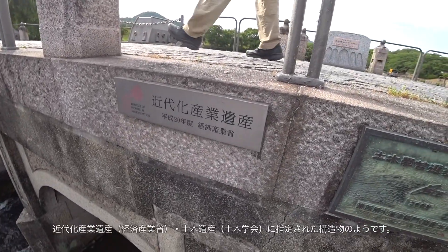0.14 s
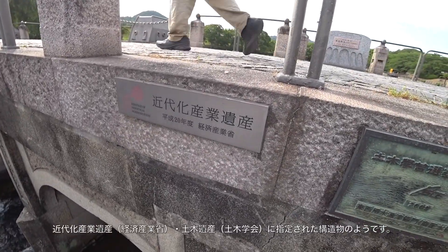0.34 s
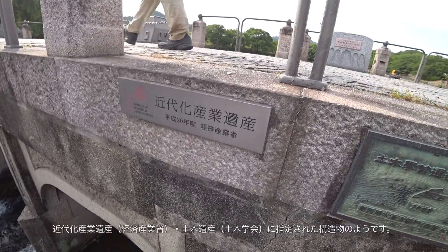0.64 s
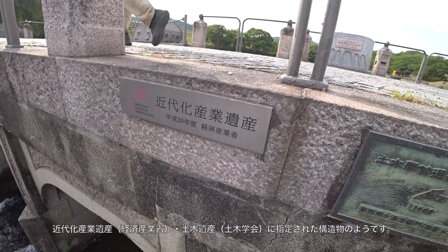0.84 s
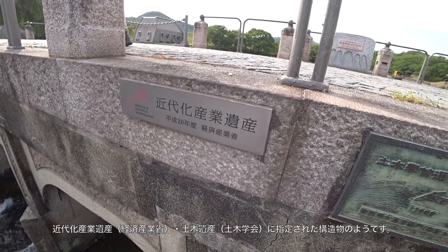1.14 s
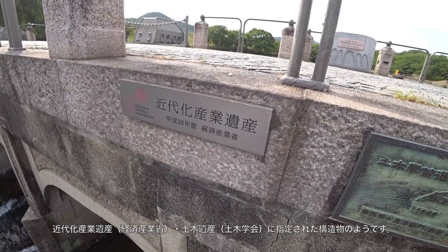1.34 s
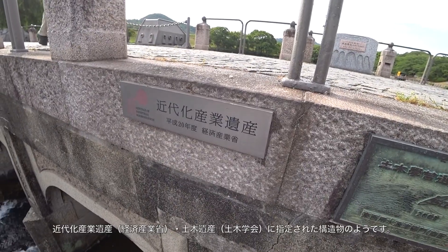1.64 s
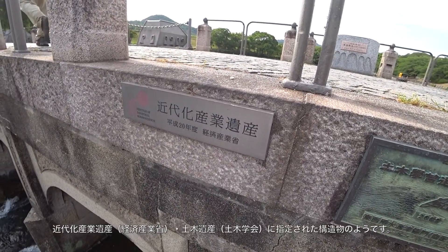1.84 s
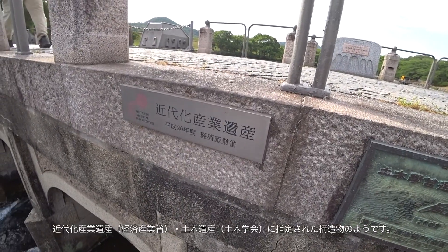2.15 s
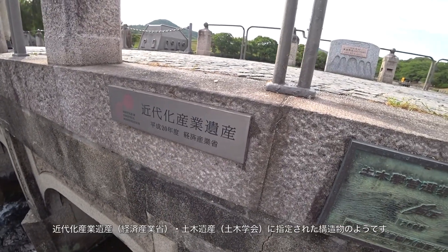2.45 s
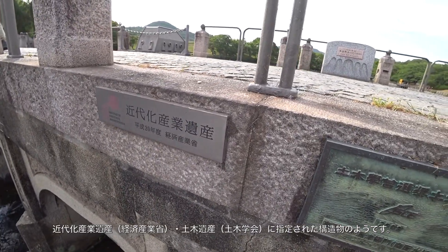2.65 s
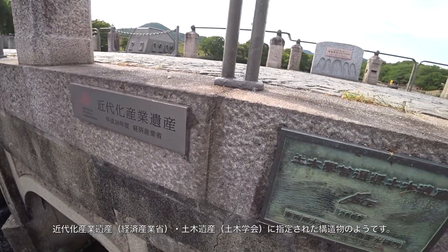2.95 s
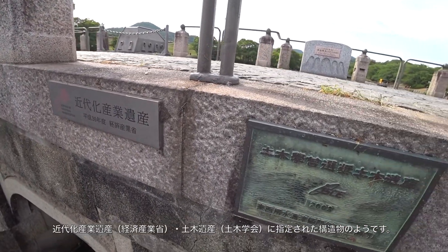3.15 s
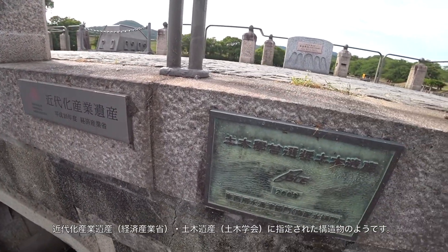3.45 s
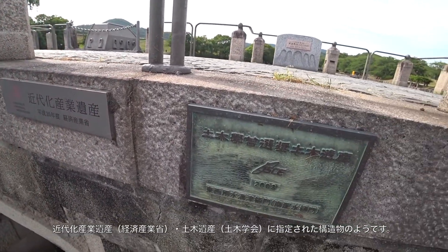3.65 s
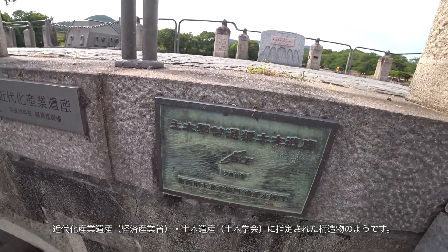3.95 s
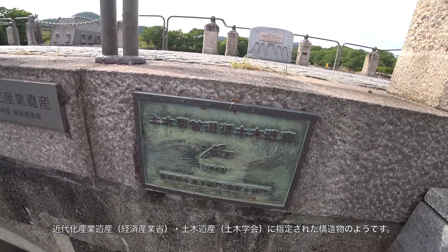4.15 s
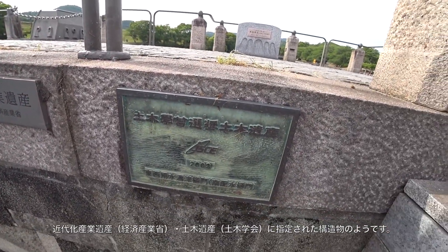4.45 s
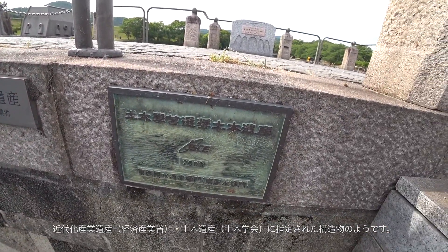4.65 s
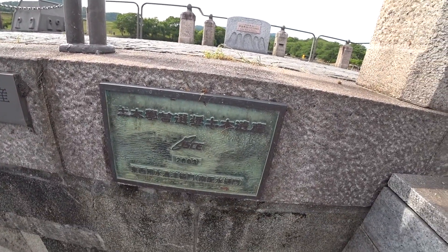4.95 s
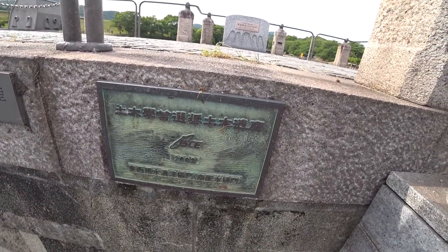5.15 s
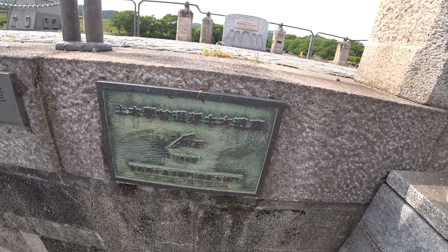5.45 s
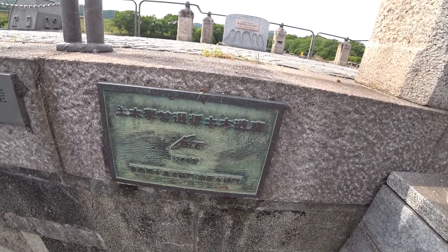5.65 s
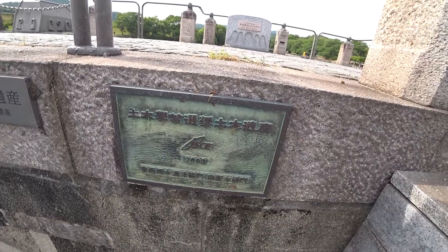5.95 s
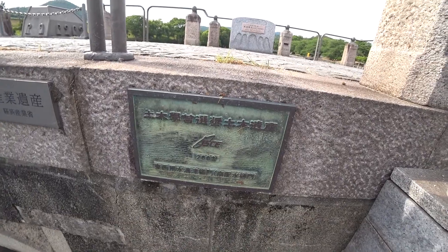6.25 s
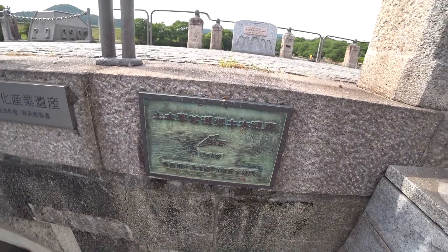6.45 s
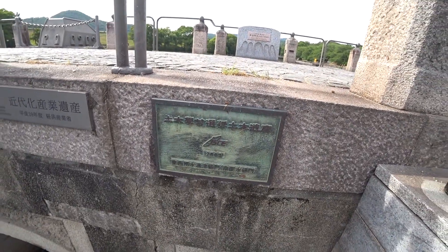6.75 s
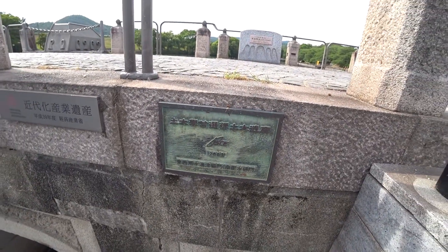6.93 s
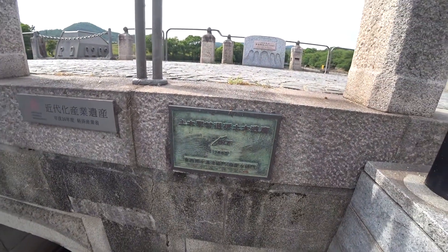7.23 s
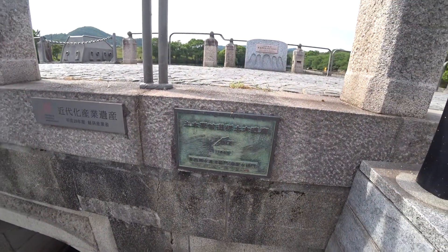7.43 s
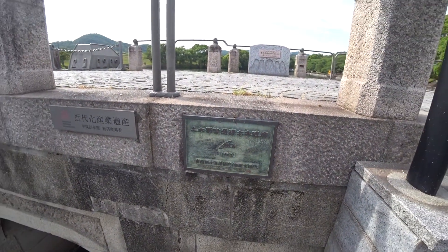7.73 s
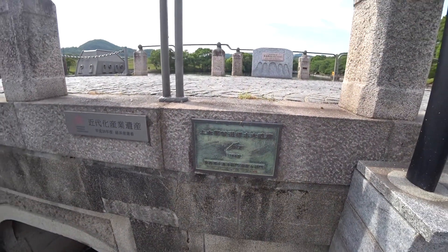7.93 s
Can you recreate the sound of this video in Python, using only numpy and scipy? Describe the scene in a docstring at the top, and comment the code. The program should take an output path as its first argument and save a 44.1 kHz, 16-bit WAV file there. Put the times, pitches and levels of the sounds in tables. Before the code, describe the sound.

A steady rush of falling water in a stone channel, with hissing spray, small bubbling pops and faint hollow glugs.

```python
"""Stone channel below a sluice gate: falling water roars, surges and throws spray.
Crowds of bubbles fizz and gurgle; the largest ping out of the roar and echo off the wall.
The arch booms and hollows glug. Low thuds join at 3.6 s, puffs of breeze at 5.5 s.
The mid-treble is nearly mono at first, widens mid-scene, then narrows again."""
import sys
import numpy as np
from scipy import signal
from scipy.fft import rfft, irfft, next_fast_len
from scipy.io import wavfile
from scipy.ndimage import uniform_filter1d, map_coordinates

SR = 44100
rng = np.random.default_rng(int(sys.argv[2]) if len(sys.argv) > 2 else 0)


def dump_mix(stems):
    """Bounce the given channels to the path in sys.argv[1] as a 16-bit WAV at rate SR."""
    frames = np.atleast_2d(stems).T  # one column per channel
    limited = np.clip(frames, -1, 1)  # hard clip at full scale
    pcm = np.round(limited * 32767).astype(np.int16)
    wavfile.write(sys.argv[1], SR, pcm)


N = 356769

# Falling water (frequency [Hz], density [dB])
WATER_SPECTRUM = [(15, -75), (25, -52), (156, -31), (216, -23), (435, -4.5), (570, -3.5), (670, -1.5),
                  (1150, -1.5), (1500, -2.5), (1720, -2), (1870, -3.5), (2950, -6), (5950, -9.5),
                  (10800, -18), (15700, -31)]
# Channel resonances (time [s], arch boom [dB], hollow glug [dB])
HOLLOW_LEVELS = [(0, -52.5, -75), (1, -49, -55), (2.2, -48, -58), (2.9, -57, -71), (3.6, -61, -54),
                 (4.6, -70, -49), (5.3, -59, -48), (5.8, -71, -47), (6.3, -52, -50), (7, -62, -51),
                 (8.09, -59, -70)]
# Lowest rumble (time [s], level [dB])
RUMBLE_LEVELS = [(0, -64), (.6, -71), (2.8, -72), (3.8, -67.5), (5, -67.5), (6.5, -67), (8.09, -69)]
# Slow swell of the fall (time [s], roar [dB], spray over roar [dB])
FLOW_LEVELS = [(0, -28.5, -5), (.3, -29, -2.5), (.75, -30, -1.5), (1.1, -28, -2), (1.6, -28, -3.5),
               (2.1, -29.5, -1), (2.5, -31, -2), (2.85, -30, -3), (3.4, -29, -4.5), (3.9, -29.5, -3.5),
               (4.4, -30, -4), (4.9, -30.5, -3.5), (5.3, -29, -3), (5.6, -31, -2.5), (6.3, -28.5, -4),
               (6.8, -29.5, -5), (7.4, -30, -2.5), (8.09, -28.5, -5.5)]
# Sheets of water gather and slap down (time [s], spray lift [dB], roar lift [dB])
SHEET_SLAPS = [(.03, 3, 2), (.11, 3.5, 1), (.18, 2.5, 1.5), (.31, -1, 0.5), (.55, 3, 3), (.62, 1, 2),
               (.93, 0.5, -0.5), (1.0, 1.5, 0.5), (1.37, 1.5, 1), (1.43, 2, 0.5), (1.47, 3, -0.5),
               (1.71, 1, 2), (1.76, 3, -1), (2.14, 0, 3), (2.31, 1, -2), (2.345, 3.5, 5), (2.63, 4, 0.5),
               (2.74, 2, -2), (3.01, 2, 0), (3.13, 1.5, 0), (3.325, 0.5, 3), (3.54, 1.5, 1), (3.72, 2, 0.5),
               (4.49, 1, 1.5), (5.2, -0.5, 0.5), (5.29, 1, 0), (5.4, -0.5, 1), (5.47, 3.5, 2),
               (6.19, 1.5, -0.5), (6.7, 2.5, 0.5), (6.92, 1.5, 0), (7.6, 0, 0), (7.82, 2.5, 0.5),
               (7.97, 1.5, 1.5)]
# Brief level dips (time [s], depth [dB])
DIPS = [(.075, 1.5), (.72, 1.5), (.59, 1), (2.27, -2), (2.42, -1), (2.88, 0.5), (4.35, 1.5), (4.93, 3.5),
        (5.53, 0.5), (6.74, 2.5)]
# Largest bubbles, and a few brief slaps of water that ring out like them (time [s], pitch [Hz], peak [dB], half
# length [ms])
DISTINCT_RINGS = [(0.3178, 7300, -27, 1.5), (0.7962, 12403, -27, 1.0), (.522, 7670, -28, 1.5),
                  (.551, 7840, -28, 1.5), (.554, 6720, -27, 1.5), (.555, 740, -34, 12), (.566, 1780, -24, 5),
                  (.605, 7670, -28, 1.5), (.614, 4200, -27, 1), (.616, 2040, -21, 4), (.722, 9100, -25, .8),
                  (.9285, 4330, -19, 1.4), (0.929, 6100, -24, 1.5), (1.014, 1640, -22, 5),
                  (1.036, 11000, -29, 1), (1.131, 4730, -25, 2), (1.2505, 1060, -20, 2.2),
                  (1.291, 9560, -29, 1.5), (1.411, 5000, -25, 1.8), (1.426, 10100, -26, 1.2),
                  (1.43, 6500, -20, 1), (1.448, 10500, -26, 1.2), (1.5265, 8039, -24, 1.2),
                  (1.733, 3750, -24, 2.5), (1.737, 1640, -26, 5), (2.022, 7490, -27, 1.5),
                  (2.061, 696, -26, 12), (2.1048, 3150, -20, 1.7), (2.1637, 1730, -21, 4.7),
                  (2.1638, 3030, -12, 1.8), (2.2999, 14240, -24, 0.3), (2.3307, 2000, -14, .7),
                  (2.335, 7670, -28, 1.5), (2.336, 1000, -25, 6), (2.341, 4900, -25, 1.5),
                  (2.35, 8180, -28, 1.5), (2.439, 2400, -21, 3.4), (2.7162, 6431, -24, 1.9),
                  (2.7347, 3260, -21, 1.7), (3.1341, 6170, -18, 2), (3.1676, 2123, -25, 6.3),
                  (3.3181, 6400, -21, 1.6), (3.319, 4130, -26, 1.8), (3.3295, 9900, -20, 0.7),
                  (3.33, 5170, -25, 1), (3.5336, 4570, -21, 1.6), (3.713, 516, -30, 8.8),
                  (3.722, 6550, -26, 1.5), (3.758, 6370, -22, 1.5), (3.9053, 2756, -21, 1.3),
                  (4.239, 686, -26, 10), (4.312, 5940, -23, 1.8), (4.426, 7920, -30, 1.5),
                  (4.476, 3550, -27, 2.5), (4.506, 540, -30, 13), (4.3717, 10335, -30, 1.2),
                  (4.621, 10800, -24, 1.1), (4.664, 12800, -37, 1), (4.873, 10700, -34, 1),
                  (4.886, 8700, -32, 1.2), (5.082, 11200, -33, 1), (5.206, 11000, -31, 1),
                  (5.265, 11600, -32, 1), (5.449, 10300, -30, 1), (5.7, 9400, -32, 1.2),
                  (5.785, 10900, -33, 1), (6.103, 12700, -31, 1), (6.418, 8100, -31, 1.3),
                  (6.621, 7060, -25, 1.4), (4.8033, 11254, -29, 1.4), (4.895, 2910, -27, 5),
                  (4.988, 4900, -30, 3), (4.989, 2990, -26, 9.8), (5.042, 600, -37, 12),
                  (5.144, 2850, -25, 3), (5.157, 2950, -27, 3), (5.181, 2450, -28, 3),
                  (5.204, 2830, -24, 2.4), (5.2525, 2900, -24, 2.4), (5.284, 2450, -23, 3),
                  (5.345, 1950, -24, 2.7), (5.449, 2420, -25, 7), (5.2527, 573, -28, 18),
                  (5.3164, 4560, -23, 2.6), (5.718, 2460, -23, 3.9), (5.396, 595, -24, 3.6),
                  (5.46, 1180, -20, 6.3), (5.684, 800, -27, 10), (5.743, 2960, -27, 6),
                  (5.7741, 1247, -22, 4.8), (5.825, 2800, -26, 6), (5.889, 5770, -29, 1.6),
                  (6.1038, 613, -29, 19), (6.1649, 6700, -21, 1.6), (6.1959, 3580, -14, 2.1),
                  (6.259, 9390, -30, 1.4), (6.321, 600, -28, 7.8), (6.591, 3010, -20, 2),
                  (6.92, 2752, -26, 3.9), (6.922, 6030, -28, 1.5), (6.938, 4480, -27, 2.5),
                  (7.04, 570, -27, 7.8), (7.332, 750, -27, 9.3), (7.5384, 1850, -26, 6.8),
                  (7.6044, 7360, -27, 2.7), (7.8302, 4400, -25, 2.4), (7.9203, 1790, -24, 9.6),
                  (7.933, 1050, -25, 8)]
# Low knocks (time [s], relative level [dB], pitch [Hz])
KNOCKS = [(3.571, -52, 152), (4.064, -50, 160), (4.519, -52, 155), (4.796, -56, 166), (5.279, -46, 172),
          (5.369, -51, 151), (6.078, -51, 97), (6.311, -49, 171), (6.6, -47, 162), (6.917, -53, 171)]
# Puffs of breeze (time [s], level [dB], half length [s])
PUFFS = [(5.55, -61, 0.13), (5.88, -64, .1), (6.07, -54, 0.074), (6.93, -60, 0.091), (7.2, -65, 0.15),
         (7.575, -60, .07), (8.0, -66, 0.14)]
# Breeze on the microphone ports (frequency [Hz], density [dB])
PUFF_SPECTRUM = [(20, -16), (60, -11), (110, -2), (200, 6), (400, -40), (800, -120)]
# Stereo image (time [s], left over right below 3 kHz [dB], mid-treble width [dB], top width [dB])
STEREO_IMAGE = [(0, .6, -41, -4), (1.1, 0.8, -44, -7), (1.6, .7, -39, -5), (2.1, 0.5, -25, -1),
                (3, .9, -15, 0), (3.8, 1, -1, 1), (4.8, 1, -1, 2), (5.5, 1.2, -3, 0), (6.75, 0.5, -2.5, 0),
                (7.1, 1.2, -33, 0), (8.09, 0.5, -50, -2)]
# Left-right likeness at 0 dB width (frequency [Hz], coherence [0-1])
PORT_COHERENCE = [(60, .93), (140, .97), (440, .98), (880, .89), (1300, .8), (2600, .79), (5200, .77),
                  (7500, .84), (9300, .69), (11500, .54), (14000, .41)]
# Phase between the ports (frequency [Hz], left lead [rad])
PORT_LEAD = [(60, -.05), (220, -.3), (440, -.5), (880, -.7), (1300, -.72), (1900, -.6), (2600, -.45),
             (3700, -.2), (5200, -.03), (7800, 0), (9300, .3), (11500, .55), (15000, .5)]
# Colour of the camera body (frequency [Hz], gain [dB])
BODY_RESPONSE = [(6000, -1.5), (7800, 1), (8700, -1.5), (10800, 2), (13000, 1)]

TIME_S = np.arange(N) / SR


def amp(db):
    """Decibels to gain."""
    return 10 ** (np.asarray(db) / 20)


def unit(x):
    """Scale to rms 1."""
    return x / np.sqrt(np.mean(np.abs(x) ** 2) + 1e-20)


def along(points, hz):
    """Interpolate (frequency [Hz], value) on a log axis."""
    knots_hz, values = np.transpose(points)
    return np.interp(np.log(hz + 1), np.log(knots_hz + 1), values)


def curves(rows):
    """One per-sample curve for each column after the time."""
    at_s, *cols = np.transpose(rows)
    return [np.interp(TIME_S, at_s, col) for col in cols]


def swells(rows, rise_s, fall_s):
    """Summed bells at the row times, one curve per further column."""
    at_s, *cols = np.transpose(rows)
    late_s = TIME_S - at_s[:, None]
    return np.array(cols) @ np.exp(-(late_s / np.where(late_s < 0, rise_s, fall_s)) ** 2)


def wobble(rate_hz):
    """Smooth random curve."""
    return map_coordinates(rng.standard_normal(1000), [TIME_S * rate_hz])


def filtered(x, response):
    """Apply a complex frequency response."""
    size = next_fast_len(N + 8192)
    return irfft(rfft(x, size) * response(np.fft.rfftfreq(size, 1 / SR)), size)[..., :N]


def under(hz, edge_hz, order):
    """Low-pass gain."""
    return 1 / (1 + (hz / edge_hz) ** order)


def above(hz, edge_hz, order):
    """High-pass gain."""
    return 1 - under(hz, edge_hz, order)


def bubble_rings(at_s, hz, gain, life_s, rise, half_samples):
    """Bell-shaped sine bursts; pitch rises as a bubble nears the surface."""
    t = np.arange(-half_samples, half_samples + 1) / SR
    age = t / life_s[:, None]
    rings = gain[:, None] * np.exp(-2 * age ** 2) * np.sin(2 * np.pi * hz[:, None] * t * (1 + rise * age))
    index = np.clip(np.round((at_s[:, None] + t) * SR).astype(int), 0, N - 1)
    return np.bincount(index.ravel(), rings.ravel(), N)


def bubble_crowd(density, lo_hz, hi_hz, cycles, spread_db, count, half_samples):
    """Bubbles of many sizes, bursting more often where density is high."""
    when, pitch, length, size = rng.random((count, 4)).T
    at_s = np.interp(when, np.cumsum(density) / density.sum(), TIME_S)
    hz = lo_hz + (hi_hz - lo_hz) * pitch
    life_s = np.minimum(cycles * (.5 + length) / hz, half_samples / 2 / SR)
    gain = amp(-spread_db * np.log(size + 0.011)) / np.sqrt(life_s)
    return unit(bubble_rings(at_s, hz, gain, life_s, rise=0.046, half_samples=half_samples))


def water_sheet(depth_db, bins, frames):
    """Hiss of the sheet: two noises sharing random gain patches in time and frequency."""
    spectra = signal.stft(rng.standard_normal((2, N)), nperseg=256)[2]
    patches = uniform_filter1d(rng.standard_normal(spectra.shape[1:]), bins, axis=0)
    patches = unit(uniform_filter1d(patches, frames, axis=1))
    return unit(signal.istft(spectra * amp(depth_db * patches), nperseg=256)[1][:, :N])


def water_noise(splash):
    """Sheet hiss, fizz that follows the splashes, gurgle from the heaving pool."""
    sheet = water_sheet(depth_db=0.62, bins=5, frames=9)
    fizz = [bubble_crowd(amp(2.2 * splash), lo_hz=1980, hi_hz=14900, cycles=2.7, spread_db=2,
                         count=9000, half_samples=96) for _ in sheet]
    churn = amp(2.5 * wobble(6))
    gurgle = [bubble_crowd(churn, lo_hz=483, hi_hz=5554, cycles=22, spread_db=0,
                           count=2000, half_samples=400) for _ in sheet]
    return sheet + amp(-10.5) * np.array(fizz) + amp(-14.5) * np.array(gurgle)


def water_band(water, response):
    """One band of the fall's spectrum, rms 1."""
    return unit(filtered(water, lambda hz: amp(along(WATER_SPECTRUM, hz)) * response(hz)))


def hollows(water):
    """One wide resonance booms under the arch; three narrow ones glug in scattered gulps."""
    def resonance(centre_hz, log_width):
        return water_band(water, lambda hz: np.exp(-(np.log((hz + 1) / centre_hz) / log_width) ** 2))

    boom_db, glug_db = curves(HOLLOW_LEVELS)
    gulps = sum(gain * amp(3.2 * wobble(11)) * resonance(hz, 0.12)
                for hz, gain in [(488, 1), (558, 3), (616, 1)])
    return amp(boom_db) * resonance(290, 0.34) + amp(glug_db) * unit(gulps)


def rumble(water):
    """Lowest band of the fall, wavering in level."""
    level_db = curves(RUMBLE_LEVELS)[0] + 3.9 * wobble(14)
    return amp(level_db) * water_band(water, lambda hz: under(hz, 162, 6.2))


def roar_and_spray(water, splash, bubbles):
    """Middle and treble of the fall; both surge as sheets slap down and dip briefly."""
    flow_db, spray_over_db = curves(FLOW_LEVELS)
    dip_db, = swells(DIPS, rise_s=0.017, fall_s=0.017)
    spray_lift_db, roar_lift_db = swells(SHEET_SLAPS, rise_s=0.036, fall_s=0.029)
    roar_db = flow_db - dip_db + roar_lift_db + 0.051 * splash
    spray_db = flow_db + spray_over_db - 0.57 * dip_db + spray_lift_db + 0.47 * splash
    roar = water_band(water, lambda hz: under(hz, 2870, 2.78) * above(hz, 150, 3))
    spray = water_band(water, lambda hz: above(hz, 2920, 1.53))
    return amp(roar_db) * roar + amp(spray_db) * spatter(bubbles, half_s=0.0018, lift=0.59) * spray


def distinct_bubbles(count, lo_hz, hi_hz):
    """DISTINCT_RINGS plus random middling bubbles, quieter the higher they ring."""
    when, pitch, size, length = rng.random((count, 4)).T
    hz = lo_hz * (hi_hz / lo_hz) ** pitch
    peak_db = -28 - 11 * pitch + 2 * (2 * size - 1)
    cycles = 11 * (.5 + length)
    return np.vstack([DISTINCT_RINGS, np.transpose([when * TIME_S[-1], hz, peak_db, 1000 * cycles / hz])])


def spatter(bubbles, half_s, lift):
    """Spray gain: flares wherever a short bubble or slap rings."""
    at_s, _, _, life_ms = bubbles.T
    bursts = np.bincount(np.round(at_s * SR).astype(int), 1 / (1 + (life_ms / 2) ** 4), N)
    bell = np.exp(-(np.arange(-400, 401) / SR / half_s) ** 2)
    return 1 + lift * signal.fftconvolve(bursts, bell, "same")


def pings(bubbles, rise_per_s=40, echo_s=0.0038, echo_db=-10):
    """Each distinct bubble or slap rings briefly and returns once from the wall."""
    at_s, hz, peak_db, life_ms = bubbles.T
    life_s = life_ms / 1000
    rise = rise_per_s * life_s / (1 + (life_ms / 2) ** 2)  # long rings hold their pitch
    direct, echo = (bubble_rings(at_s + delay_s, hz, amp(peak_db), life_s, rise[:, None], 900)
                    for delay_s in (0, echo_s))
    return direct + amp(echo_db) * echo


def thuds(attack_s=0.0089, t60_s=0.18):
    """Soft low knocks: damped sines, uneven in pitch and level."""
    out, t = np.zeros(N + SR), np.arange(SR // 4) / SR
    for at_s, level_db, hz in KNOCKS:
        drift, lumps = (map_coordinates(knots, [t * 70]) for knots in rng.standard_normal((2, 40)))
        envelope = amp(2.2 * lumps - 60 * t / t60_s) * (1 - np.exp(-t / attack_s))
        swing = envelope * np.sin(2 * np.pi * hz * t + 0.7 * drift)
        out[round(at_s * SR):][:len(t)] += 0.22 * amp(level_db) * unit(swing)
    return out[:N]


def breeze():
    """Puffs of air swell and fade, buffeting each port separately."""
    buffet = amp(2.2 * np.array([wobble(25), wobble(25)])) * rng.standard_normal((2, N))
    envelope = sum(amp(db) * np.exp(-((TIME_S - at_s) / half_s) ** 2) for at_s, db, half_s in PUFFS)
    return envelope * unit(filtered(buffet, lambda hz: amp(along(PUFF_SPECTRUM, hz))))


def ports(centre, side_noise):
    """Unrelated water noise widens the stereo image; its treble share varies over time."""
    pan_db, middle_db, top_db = curves(STEREO_IMAGE)
    angle_rad = lambda hz: np.arccos(np.clip(along(PORT_COHERENCE, hz), 0, 1)) / 2
    high = lambda hz: above(hz, 3840, 42)
    top = lambda hz: above(hz, 8650, 34)
    side_band = lambda response: filtered(side_noise, lambda hz: np.sin(angle_rad(hz)) * response(hz))
    mid = filtered(centre, lambda hz: np.cos(angle_rad(hz)))
    side = (side_band(lambda hz: 1 - high(hz))
            + amp(middle_db) * side_band(lambda hz: high(hz) - top(hz))
            + amp(top_db) * side_band(top))
    sign = np.array([[1], [-1]])
    pair = filtered(mid + sign * side, lambda hz: np.exp(sign * .5j * along(PORT_LEAD, hz)))
    treble = filtered(pair, lambda hz: above(hz, 3000, 5.8))
    return treble + (pair - treble) * amp(sign * pan_db / 2)  # spray centred, roar leans left


def scene():
    """Water, thuds and breeze at the two ports."""
    bubbles = distinct_bubbles(count=50, lo_hz=1800, hi_hz=13900)
    splash = .6 * wobble(18) + 1.1 * wobble(45) + .8 * wobble(110)  # sheets of water break up
    water = water_noise(splash)
    centre, side_noise = hollows(water) + rumble(water) + roar_and_spray(water, splash, bubbles)
    return ports(centre + pings(bubbles) + thuds(), side_noise) + breeze()


def record(dry):
    """The camera colours the treble and cuts off at 15.8 kHz."""
    return filtered(dry, lambda hz: amp(along(BODY_RESPONSE, hz)) * (hz < 15800))


dry = scene()
out = record(dry)
dump_mix(out)
```